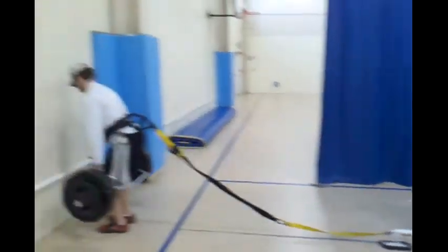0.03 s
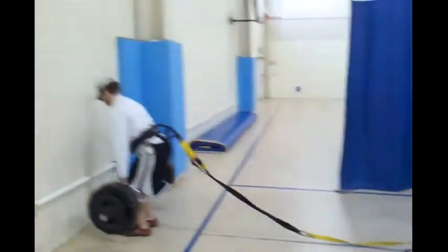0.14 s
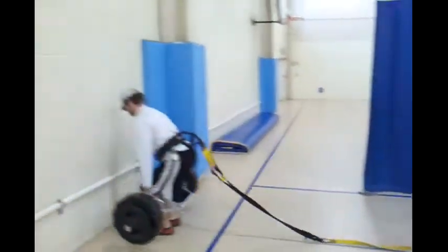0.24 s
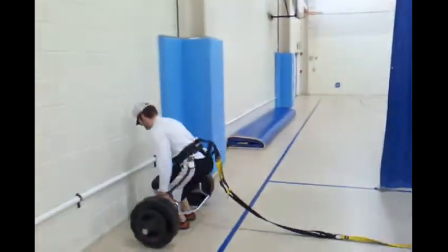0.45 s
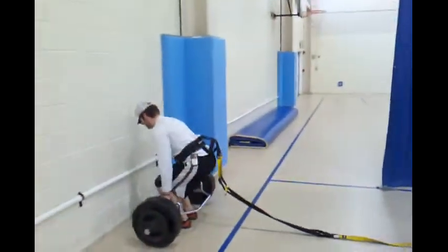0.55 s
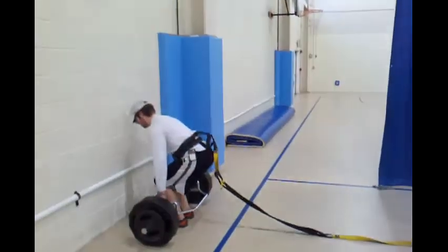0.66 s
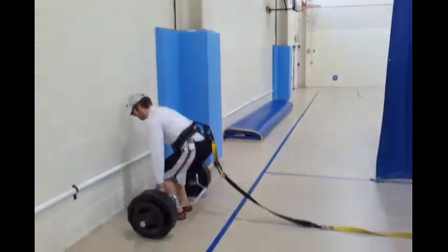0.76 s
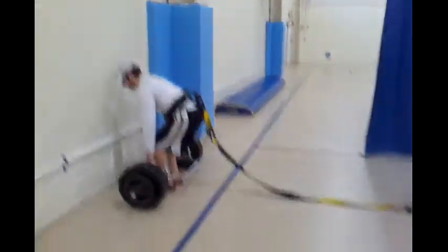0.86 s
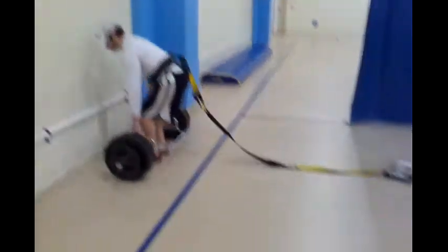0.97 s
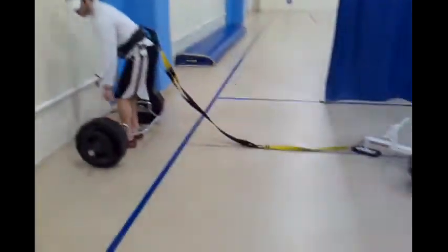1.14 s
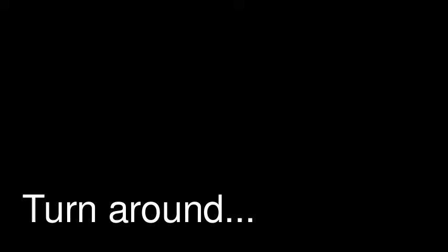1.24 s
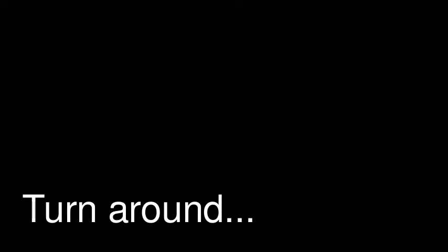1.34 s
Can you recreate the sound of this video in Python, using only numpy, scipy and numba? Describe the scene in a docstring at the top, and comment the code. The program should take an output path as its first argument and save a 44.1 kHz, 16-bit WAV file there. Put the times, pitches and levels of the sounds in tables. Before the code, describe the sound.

A loaded barbell drops on a hard floor, plates clanging through an echoing gym.

```python
"""A loaded barbell drops on the hard floor of a big gym hall: a thud, then clashing, ringing iron plates.
Footsteps with a scuff and sharp sole clicks lead in; one more scuff follows the drop.
The far walls answer and the hall rings on over a bed of room tone.
Two close microphones give the width; their automatic gain ducks at the crash and slowly recovers."""
import sys
import numpy as np
from scipy import signal
from scipy.fft import rfft, irfft
from scipy.io import wavfile
from scipy.ndimage import uniform_filter1d
from numba import njit

SR = 44100
rng = np.random.default_rng(int(sys.argv[2]) if len(sys.argv) > 2 else 0)


def to_wav(sig):
    """Store sig (one row per channel, or 1-D mono) as 16-bit WAV at the path in sys.argv[1].

    Samples outside -1..1 are clipped; the rate is SR.
    """
    pcm = np.clip(np.atleast_2d(sig), -1, 1) * 32767
    pcm = np.round(pcm).astype(np.int16)
    wavfile.write(sys.argv[1], SR, pcm.T)  # frames by channels


N = 61739

# colour of the hall's room tone (frequency [Hz], level [dB])
ROOM_TONE_EQ = [(25, 0.5), (60, -18), (120, 2), (220, -7), (360, -3.5), (600, -6), (1300, -6.5),
                (2500, -15.5), (4500, -24.5), (7500, -24), (10000, -36), (14000, -42)]
# footfalls and heel knocks (time [s], thump level [dB], slap level [dB])
FOOTFALLS = [(.01, -26.5, -52.5), (.153, -29.5, -37), (0.171, -27, -26), (0.2091, -25, -23.5),
             (0.2205, -22, -22.5), (.373, -24, -43.5)]
# dull body of a footfall (frequency [Hz], level [dB])
THUMP_EQ = [(30, -12), (70, -9), (115, 4.5), (180, 1.5), (400, -0.5), (1200, -10), (2500, -18), (8000, -36)]
# bright slap of a sole (frequency [Hz], level [dB])
SLAP_EQ = [(200, -14.5), (1200, 2), (3500, -1), (7500, -6.5), (13000, -9)]
# soles scuffing the floor (time [s], length [s], level [dB])
SCUFF_CUES = [(0.148, 0.1, -28.5), (1.157, 0.087, -33)]
# colour of a scuff (frequency [Hz], level [dB])
SCUFF_EQ = [(300, -24), (2000, 7), (4300, -5.5), (7500, 2), (10000, -4), (13500, -11.5)]
# a sole clicking on the floor (time [s], level [dB])
CLICK_CUES = [(0.2107, -12.5), (0.2248, -14.5)]
# the two ends of the bar landing (time [s], level [dB])
BAR_LANDINGS = [(0.4096, 2), (.4275, -6.5)]
# plates clashing on the bar and settling (time [s], low ring level [dB], treble level [dB])
PLATE_HITS = [(0.4122, -1.5, -2), (0.4228, -4.5, 3), (0.4325, -3, -8), (0.4445, 6.5, -8.5),
              (0.462, 1.5, -10), (0.563, 1.5, -37.5), (.654, -10.5, -15.5)]
# ringing modes of the plates (frequency [Hz], level [dB], T60 [s])
PLATE_MODES = [(433.2, -12.5, .1), (605.6, -9, 0.078), (648, -6, 0.065), (700, -6.5, 0.068),
               (975, -5, 0.12), (1038.5, -2, 0.12), (1118, -0.5, 0.17), (1204.3, 4.5, 0.078),
               (1250, -1.5, 0.13), (1289.6, -3, 0.066), (1409, -19, 0.36), (1820, -6.5, 0.15),
               (1914, 1.5, 0.079), (2004, -8, 0.12), (4100, -3, .1), (4007, -16.5, 0.33),
               (6800, -11.5, 0.02), (7620, -11.5, 0.14)]
# dense high ringing of iron on iron (frequency [Hz], level [dB])
CRACK_EQ = [(150, -13), (500, -5.5), (1200, 5), (2200, 1), (3000, 3), (4500, -1.5), (6000, 1.5),
            (7800, 1.5), (9800, -12), (13500, -16.5)]
# snap at the front of each clash (frequency [Hz], level [dB])
SNAP_EQ = [(100, 3.5), (400, 3), (1500, -6.5), (4500, 1), (9000, 1.5), (13500, 1)]
# reverb time of the hall (frequency [Hz], T60 [s])
REVERB_DECAY = [(100, 3.1), (300, 1.4), (600, 3.55), (1200, 3.57), (2500, 2.87), (4500, 1.385),
                (7500, 0.88), (12000, 0.76)]
# what the walls and the air leave of the sound (frequency [Hz], level [dB])
REVERB_EQ = [(120, -4.5), (400, 2), (1200, -3), (4000, 1), (8000, 1), (12000, -7)]
# returns from the far walls (delay [s], width [s], strength [ratio to the diffuse tail])
WALL_RETURNS = [(0.135, 0.017, 0.9), (0.235, 0.033, .8)]
# how alike the two microphones are, ahead of their comb (frequency [Hz], correlation [-1..1])
MIC_LIKENESS = [(35, -0.79), (120, .17), (250, .43), (500, 0.45), (1200, 0.91), (2900, 1.), (5800, 0.66),
                (7300, 1), (8700, 0.15), (10200, .85), (13000, 0.53)]


def undb(db):
    """Decibels to gain."""
    return 10 ** (np.asarray(db) / 20)


def curve_at(points, hz):
    """Read a curve on a log-frequency axis."""
    freqs, values = np.array(points).T
    return np.interp(np.log(hz + 1), np.log(freqs), values)


def noise(eq):
    """Mid and side noise of a given colour, rms 1."""
    gain = undb(curve_at(eq, np.fft.rfftfreq(N, 1 / SR)))
    return irfft(rfft(rng.standard_normal((2, N))) * gain, N) / np.sqrt(np.mean(gain ** 2))


def since(start):
    """Seconds since a cue, zero before it."""
    return np.maximum(np.arange(N) / SR - start, 0)


def decay(start, t60):
    """Hard attack, then a fall of 60 dB in t60 seconds."""
    t = since(start)
    return (t > 0) * np.exp(-np.log(1000) * t / t60)


def room_tone(level_db=-32.5):
    """The hall's steady, dark bed of noise."""
    return undb(level_db) * noise(ROOM_TONE_EQ)


def footsteps():
    """Each foot lands with a dull thump and a shorter slap of the sole."""
    thump, slap = noise(THUMP_EQ), noise(SLAP_EQ)
    return sum(undb(thump_db) * thump * decay(start, t60=0.089)
               + undb(slap_db) * slap * decay(start, t60=0.022)
               for start, thump_db, slap_db in FOOTFALLS)


def scuffs():
    """A sole rubs the floor: a short arch of friction noise."""
    friction, out = noise(SCUFF_EQ), 0
    for start, length, db in SCUFF_CUES:
        progress = np.minimum(since(start) / length, 1)
        out += undb(db) * friction * np.sqrt(progress * (1 - progress))
    return out


def sole_clicks():
    """Tight clicks as a sole meets the floor."""
    return noise(SLAP_EQ) * sum(undb(db) * decay(start, t60=0.008) for start, db in CLICK_CUES)


def floor_thud(hz=277, t60=0.011):
    """The floor gives a heavily damped swing under each end of the bar."""
    swing = sum(undb(db) * decay(start, t60) * np.sin(2 * np.pi * hz * since(start))
                for start, db in BAR_LANDINGS)
    return np.array([swing, 0.25 * swing])  # mid, side


def plate_clash(crack_db=-7.5, snap_db=-5, rise_s=0.004):
    """Iron strikes iron: a quick snap on top of a longer, bright crack."""
    crack, snap = undb(crack_db) * noise(CRACK_EQ), undb(snap_db) * noise(SNAP_EQ)
    out = 0
    for start, _, treble_db in PLATE_HITS:
        burst = crack * decay(start, t60=0.2) + snap * decay(start, t60=0.067)
        attack = 1 - np.exp(-since(start) / rise_s)
        out += undb(treble_db) * burst * attack
    return out


def plate_ring(trim_db=-12, rise_s=0.00065):
    """Every hit kicks the plates' modes at a random phase, and each mode rings down at its own rate."""
    starts, low_db, treble_db = np.array(PLATE_HITS).T
    phases = np.exp(2j * np.pi * rng.random((len(PLATE_HITS), len(PLATE_MODES), 2)))
    rise_pole = np.exp(-1 / (rise_s * SR))
    out = 0
    for k, (hz, mode_db, t60) in enumerate(PLATE_MODES):
        hit_db = low_db if hz < 3000 else treble_db
        kicks = np.zeros((2, N), complex)
        kicks[:, (starts * SR).astype(int)] = undb(trim_db + hit_db + mode_db) * phases[:, k].T
        decay_pole = np.exp(-np.log(1000) / (t60 * SR))
        envelope = signal.lfilter([1 - rise_pole], np.poly([rise_pole, decay_pole]), kicks)
        out += (envelope * np.exp(2j * np.pi * hz * since(0))).imag
    return out


def hall_reverb(send, trim_db=0.5, build_s=0.016):
    """A long diffuse tail that dulls as it fades and swells when the far walls answer."""
    t, freqs = since(0), np.fft.rfftfreq(N, 1 / SR)
    white, tail = rfft(rng.standard_normal((2, N))), 0
    centres = np.geomspace(80, 15000, 16)
    for hz, solo in zip(centres, np.eye(len(centres))):
        band = irfft(white * np.interp(np.log(freqs + 1), np.log(centres), solo), N)
        tail += undb(curve_at(REVERB_EQ, hz)) * band * decay(0, curve_at(REVERB_DECAY, hz))
    build = 1 - np.exp(-t / build_s)
    echoes = sum(size * np.exp(-((t - delay) / width) ** 2) for delay, width, size in WALL_RETURNS)
    response = tail * (build + echoes) * undb(trim_db) / np.sqrt(SR / 6)
    return signal.fftconvolve(send, response, axes=1)[:, :N]


def microphones(mid_side, lag_s=0.0003411):
    """A close pair: the upper bands sit by turns in the centre and at the sides."""
    freqs = np.fft.rfftfreq(N, 1 / SR)
    comb = -np.cos(2 * np.pi * np.maximum(freqs * lag_s, 0.5))
    likeness = np.clip(curve_at(MIC_LIKENESS, freqs) * comb, -1, 1)
    balance = np.sqrt(np.array([1 + likeness, 1 - likeness]) / 2)
    mid, side = irfft(rfft(mid_side) * balance, N)
    return np.array([mid + side, mid - side])  # left, right


@njit
def gain_reduction(over_db, attack_s, release_db_per_s):
    """Ducking depth in dB: grabs fast on an overshoot, lets go at a steady rate."""
    out, depth = np.empty(len(over_db)), 0.
    for i in range(len(over_db)):
        if over_db[i] > depth:
            depth += (over_db[i] - depth) / (attack_s * SR)
        else:
            depth = max(depth - release_db_per_s / SR, 0.)
        out[i] = depth
    return out


def scene():
    """Barbell and feet feed the hall; clicks and room tone stay dry."""
    iron = plate_clash() + plate_ring()
    thud = floor_thud()
    feet = footsteps() + scuffs()
    reverb = hall_reverb(iron + undb(-17) * thud + undb(5) * feet)
    return microphones(iron + thud + feet + sole_clicks() + reverb + room_tone())


def record(dry):
    """Low cut, automatic gain that ducks the crash, soft clip, an abrupt ending and a high cut."""
    low_cut_hz, high_cut_hz = 108, 14000
    threshold_db, ceiling = -14, 0.88
    end_s, fade_s = 1.2795, 0.00348
    tight = signal.sosfilt(signal.butter(3, low_cut_hz, "high", fs=SR, output="sos"), dry)
    power = uniform_filter1d(np.mean(tight ** 2, axis=0), size=128)
    over_db = 10 * np.log10(np.abs(power) + 1e-12) - threshold_db
    ducked = tight * undb(-gain_reduction(over_db, attack_s=0.018, release_db_per_s=5.5))
    rounded = ceiling * np.tanh(ducked / ceiling)
    faded = rounded * np.clip(1 - since(end_s) / fade_s, 0, 1)
    return signal.sosfilt(signal.ellip(10, 0.2, 80, high_cut_hz, fs=SR, output="sos"), faded)


dry = scene()
out = record(dry)
to_wav(out)
```